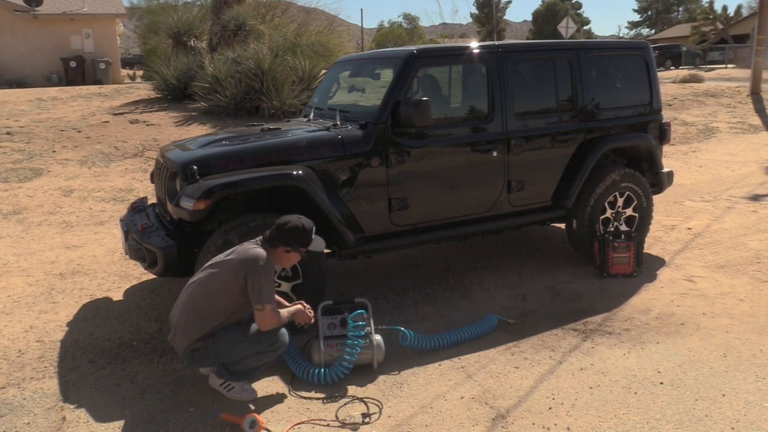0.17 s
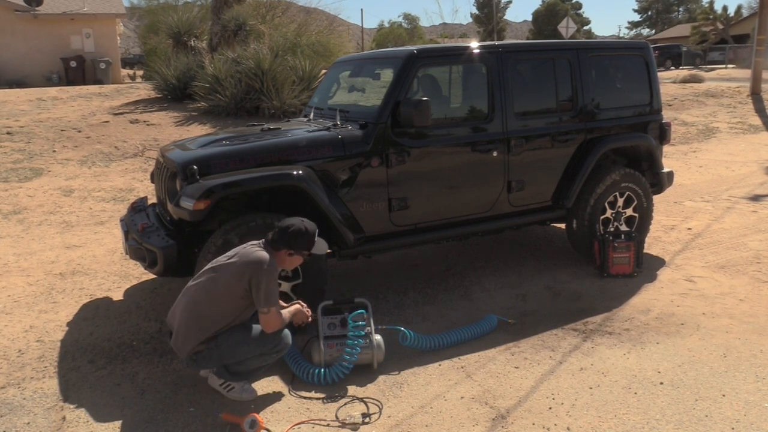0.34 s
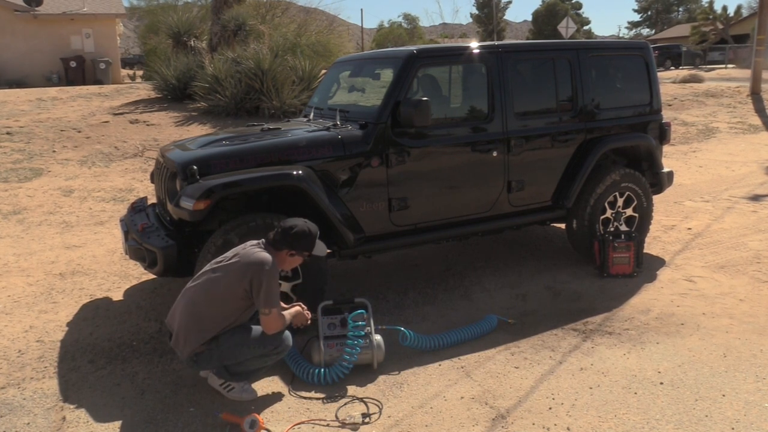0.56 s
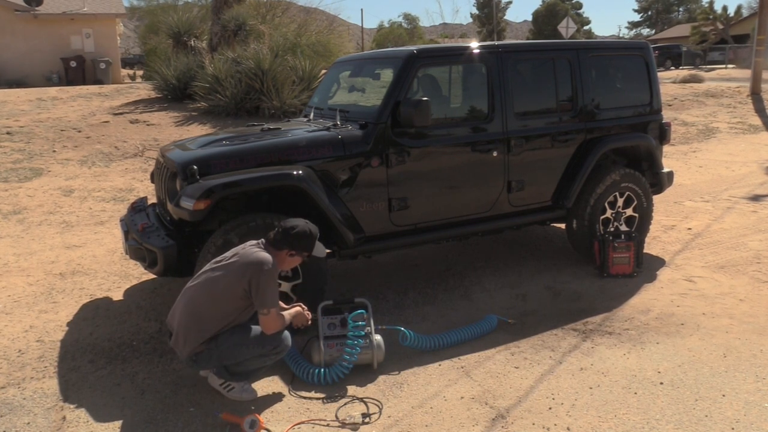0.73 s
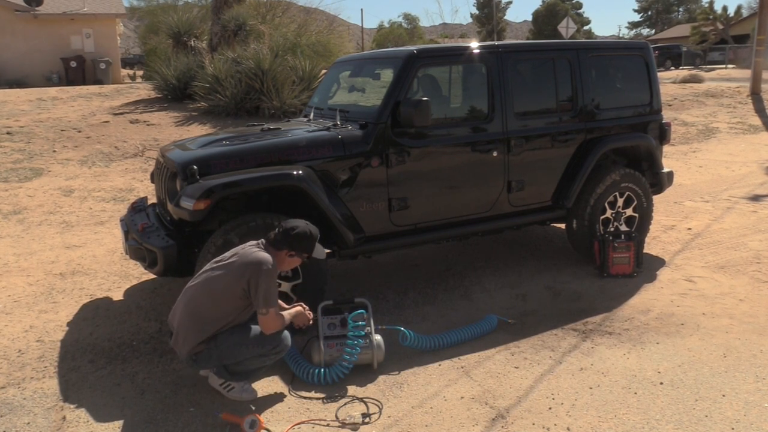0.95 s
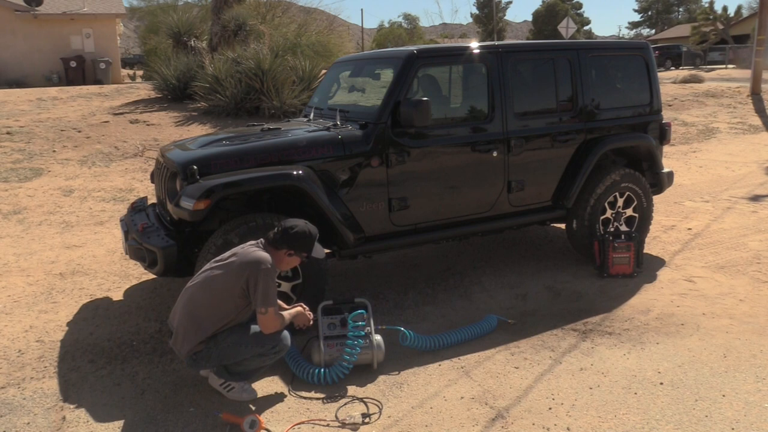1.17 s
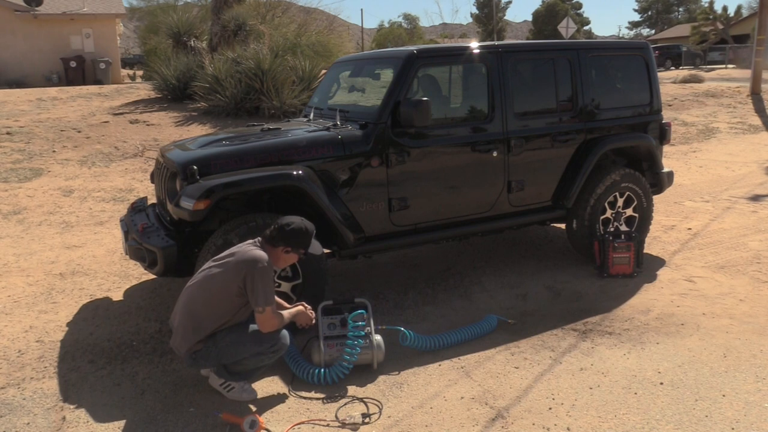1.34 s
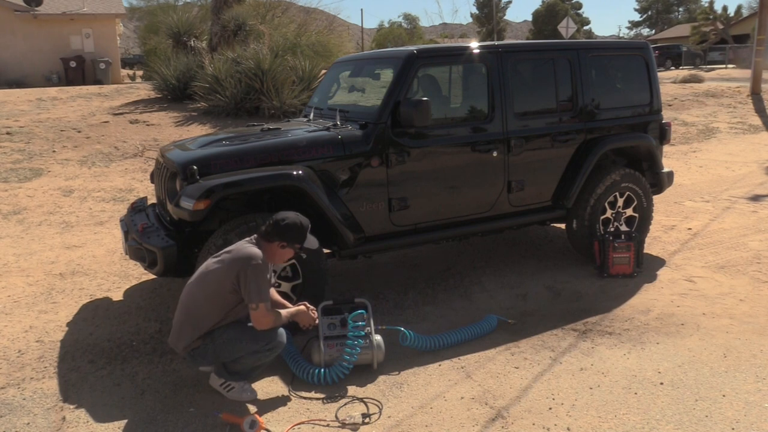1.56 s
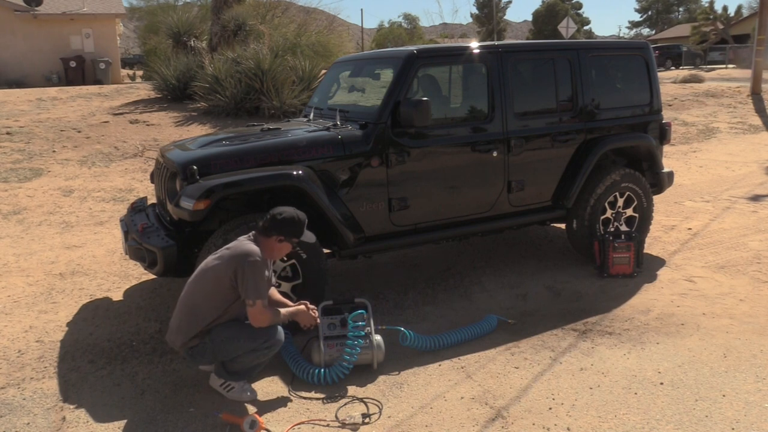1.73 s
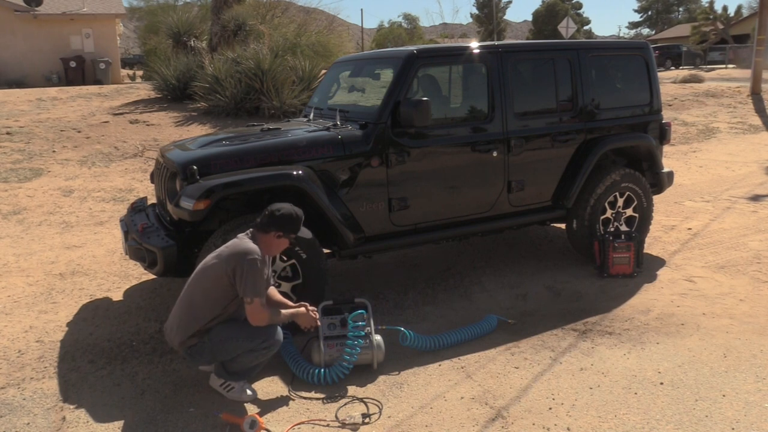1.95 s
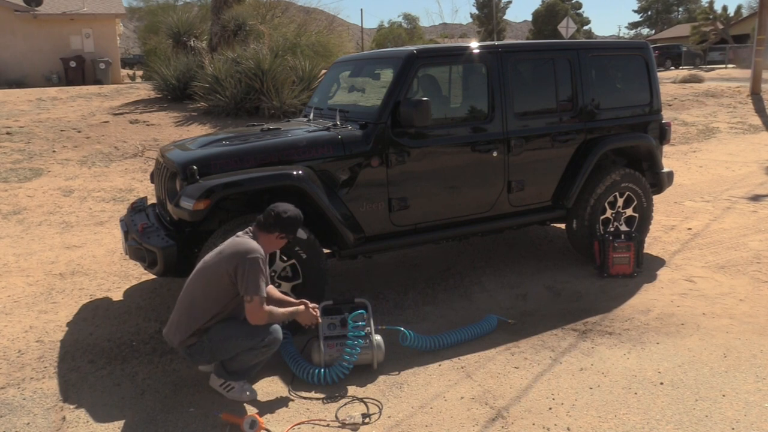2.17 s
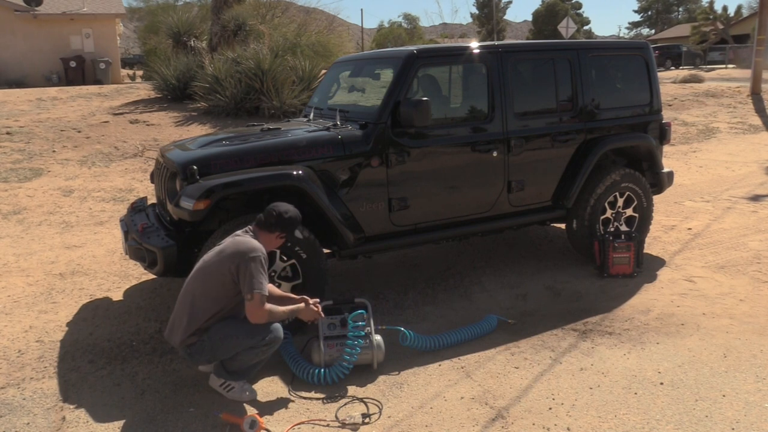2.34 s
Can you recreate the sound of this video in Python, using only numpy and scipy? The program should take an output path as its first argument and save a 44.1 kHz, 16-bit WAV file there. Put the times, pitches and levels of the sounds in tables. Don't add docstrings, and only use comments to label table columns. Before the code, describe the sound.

Steady rapid chugging of a small air compressor, with loud buffeting wind bursts in the first second.

```python
import sys
import numpy as np
from scipy import signal
from scipy.fft import rfft, irfft
from scipy.io import wavfile
from scipy.ndimage import uniform_filter1d, map_coordinates

SR = 44100
rng = np.random.default_rng(int(sys.argv[2]) if len(sys.argv) > 2 else 0)


def unload_audio(sound):
    columns = np.transpose(np.atleast_2d(sound))
    steps = np.round(np.clip(columns, -1, 1) * 32767)
    wavfile.write(sys.argv[1], SR, steps.astype(np.int16))


def makeup_ratio(level_db):
    decades = np.asarray(level_db, float) / 20
    return 10 ** decades


N = 105840

TURN_SAMPLES = 1547
# (time [s], level [dB])
MACHINE_SWELL = [(0, 1.5), (.7, 1), (.85, -1.5), (1.03, -3.5), (1.2, 1.5), (1.62, -1), (1.8, 1), (2.4, 1)]
# (place [turns], length [turns], strength [dB])
CLATTER_BLOWS = [
    (.06, 0.011, 10),
    (.17, 0.036, 5),
    (.35, 0.074, -19),
    (.58, 0.29, 1),
    (0.682, 0.057, 0),
    (.86, 0.12, -7.5),
]
# (frequency [Hz], level [dB per Hz])
CLATTER_TONE = [(71, -36), (130, 0.5), (432, -30), (624, -8), (1070, -11.5), (1410, -6.5), (1910, -5.5),
                (5500, -7.5), (7150, -37), (12100, -120)]
# (frequency [Hz], level [dB per Hz])
HISS_TONE = [(900, -6.5), (1600, -3.5), (2500, -2), (4080, -5), (5660, -8.5), (8000, -13), (10900, -21.5),
             (13500, -22.5), (15700, -38)]
# (frequency [Hz], width [Hz], boost [dB])
CASE_RINGS = [(1170, 160, 3), (1875, 90, 7), (2600, 80, 4), (2810, 70, 2), (3180, 110, 4), (3300, 50, 4),
              (3545, 120, 4), (4380, 110, 8), (6290, 300, 6), (7850, 260, 6.5), (8600, 200, 3),
              (9900, 150, 5), (12250, 220, 7)]
# (frequency [Hz], width [Hz], depth [0-1])
GROUND_DIPS = [(1724, 150, 0.05), (4350, 740, 0.4), (5410, 870, 0.71)]
# (place [turns], length [turns], strength [dB])
STROKE_PUFFS = [
    (0.099, 0.34, -4.5),
    (0.663, 0.17, -1.5),
    (0.32, 0.021, -23.5),
]
# (frequency [Hz], level [dB per Hz])
REED_TONE = [(3000, -60), (4500, -17), (5600, 9), (6300, 3), (7900, -14), (9000, -31), (12200, -19),
             (14000, -28)]
# (place [turns], pitch [Hz], peak [dB], ring [s])
REED_PINGS = [
    (.09, 6300, -46, 0.0027),
    (0.55, 7500, -49, 0.0028),
    (.1, 7900, -51, .003),
    (.62, 6400, -51, .003),
    (0.129, 12250, -57, .004),
    (0.598, 4800, -49.5, 0.0053),
]
# (shaft order [multiple], level [dB])
SHAFT_ORDERS = [(6, -58), (24, -57), (28, -59), (29, -55), (30, -57), (31, -60), (33, -56), (35, -58),
                (36, -63), (37, -54), (38, -58), (39, -57), (40, -62), (41, -53), (43, -57), (44, -60),
                (45, -56), (47, -62), (48, -60), (52, -55), (54, -58), (62, -56), (63, -57), (64, -62),
                (65, -56), (66, -51), (67, -57), (68, -61), (69, -61), (70, -60), (71, -61), (72, -60),
                (73, -61), (75, -58), (80, -62), (81, -62), (82, -59), (83, -60), (86, -62), (87, -61),
                (89, -61), (91, -57), (92, -61), (95, -62), (107, -61), (110, -59), (112, -60), (114, -62),
                (115, -60), (116, -57), (120, -62), (121, -61), (123, -58), (124, -62), (125, -57),
                (126, -59), (127, -62), (134, -62), (154, -57)]
# (frequency [Hz], level [dB])
STEREO_WIDTH = [(300, -21), (1000, -23), (2500, -17), (3600, -15), (4300, -5), (8000, -3), (15000, -2.5)]
# (frequency [Hz], level [dB per Hz])
RUMBLE_TONE = [(30, -9), (80, -2.5), (165, 6), (230, 1.5), (320, -10.5), (500, -10), (1500, -84)]
# (time [s], level [dB])
SWIRL_LEVEL = [
    (0.0, -53),
    (0.21, -38),
    (2.4, -57),
]
# (time [s], level [dB])
GUST_LEVEL = [(0, -39.5), (.2, -32.5), (.27, -29), (.29, -16.5), (.39, -19), (.46, -12.5), (.57, -16.5),
              (.6, -27.5), (.66, -38), (.71, -17), (.91, -21.5), (.99, -31.5), (1.09, -27.5), (1.33, -22.5),
              (1.45, -32), (1.49, -23), (1.57, -22), (1.63, -33.5), (1.66, -26.5), (1.82, -37.5),
              (2.0, -48), (2.18, -74), (2.27, -37)]
# (frequency [Hz], level [dB per Hz])
WIND_TONE = [(18, -74), (30, -43), (95, -19), (194, 1), (406, -3), (563, -14.5), (658, -22.5), (900, -32.5),
             (1170, -51), (1980, -120)]
# (frequency [Hz], level [dB per Hz])
SKIRT_TONE = [(350, -9), (520, 5), (800, 7.5), (1300, -29), (2500, -52), (6000, -90)]
# (time [s], length [s], depth [0-1])
LULLS = [(0.269, 0.013, 1), (0.384, 0.0092, .6), (0.434, 0.0072, 0.8), (0.595, 0.0098, 0.5),
         (0.793, 0.0081, 0.65), (0.854, .012, 0.93), (0.922, 0.0068, 0.65), (.967, 0.0073, 0.7),
         (1.006, 0.0088, 1), (1.46, 0.0095, 0.6), (1.63, 0.0096, 0.64)]
# (time [s], peak [dB], pitch [Hz])
EDDIES = [(0.2455, -15, 467), (0.255, -13, 357), (0.2934, 1.5, 403), (0.3046, -10, 320), (0.317, -3.5, 435),
          (0.3283, -7, 298), (0.3401, -3.5, 368), (0.3483, -10, 447), (0.3558, -5.5, 407), (0.365, -9, 450),
          (0.3717, -13, 430), (0.391, -13, 440), (0.3988, -10, 483), (0.4073, -4, 464), (0.433, -3.5, 365),
          (0.445, -15, 460), (0.4573, 2.5, 437), (0.4707, 4, 253), (0.4807, -7, 480), (0.4896, -7, 320),
          (0.4964, -5, 454), (0.5061, -5, 430), (0.5136, 3.5, 413), (0.5207, 0.5, 370), (0.5328, -14, 390),
          (0.5439, 1.5, 400), (0.5532, -4.5, 482), (0.5616, -0.5, 347), (0.5701, -6, 268),
          (0.6841, -11.5, 234), (0.7074, -10.5, 246), (0.7155, -4.5, 334), (0.7281, -11, 238),
          (0.762, -4, 407), (0.768, -6, 464), (0.7756, -8.5, 485), (0.8038, -7, 352), (0.8124, -6.5, 486),
          (0.837, -10.5, 380), (0.8492, -7.5, 390), (0.872, -7, 360), (0.8791, -10, 490), (0.891, -11, 328),
          (0.9, -7.5, 430), (0.9055, -7, 310), (1.1005, -12, 403), (1.1321, -17, 307), (1.2061, -19, 295),
          (1.269, -19, 360), (1.304, -10, 380), (1.3213, -11, 347), (1.4035, -16, 317), (1.4842, -9.5, 320),
          (1.5202, -22, 223), (1.5385, -9.5, 288), (1.5453, -8, 388), (1.5587, -7.5, 447),
          (1.5648, -6.5, 446), (1.6541, -15.5, 420), (1.6995, -8, 290)]
# (start [s], end [s], level [dB])
TEARS = [
    (0.27, 0.43, -34.5),
    (0.454, 0.473, -28.5),
    (0.485, 0.521, -30),
    (0.522, 0.582, -35),
    (0.702, 0.786, -36),
    (0.788, 0.812, -31.5),
    (1.215, 1.335, -56),
    (1.52, 1.578, -52),
]
# (frequency [Hz], level [dB per Hz])
RASP_TONE = [(450, -26), (600, 5), (1250, 2.5), (2700, -2.5), (4500, -15.5), (7000, -49), (12000, -90)]
# (time [s], peak [dB], pitch [Hz])
GRILLE_TICKS = [
    (0.4063, -20, 3900),
    (0.4595, -14, 4300),
    (0.4598, -23, 5800),
    (.469, -17, 3400),
    (.4691, -23, 5600),
]


def level(x, db):
    return x * makeup_ratio(db) / np.sqrt(np.mean(x ** 2))


def curve(table):
    return np.interp(np.arange(N) / SR, *np.array(table).T[:2])


def colour(x, table, rings=(), dips=()):
    hz = np.maximum(np.arange(N // 2 + 1) * SR / N, 1)
    points_hz, points_db = np.array(table)[:, :2].T
    gain = makeup_ratio(np.interp(np.log(hz), np.log(points_hz), points_db))
    for centre, width, db in rings:
        gain = gain * (1 + (makeup_ratio(db) - 1) / (1 + (2 * (hz - centre) / width) ** 2))
    for centre, width, depth in dips:
        gain = gain * (1 - depth / (1 + (2 * (hz - centre) / width) ** 2))
    return irfft(rfft(x) * gain, N)


def walk(rate):
    hold = int(SR / rate)
    steps = np.repeat(rng.standard_normal(N // hold + 1), hold)
    return 1.14 * uniform_filter1d(uniform_filter1d(steps, hold), hold)[:N]


def add(out, s, shape):
    start = int(s * SR) - len(shape) // 2
    out[..., start:start + len(shape)] += shape


def shaft():
    first_stroke_s, drift = .0005, 0.00034
    steady = np.arange(N) / TURN_SAMPLES - first_stroke_s * SR / TURN_SAMPLES + 1
    return steady + np.cumsum(drift * walk(2.93)) / TURN_SAMPLES


def valves(turn, rest_db, table):
    gate = makeup_ratio(rest_db)
    for place, length, db in table:
        u = ((turn - place + 0.13) % 1 - .1) / length
        gate = gate + makeup_ratio(db) * np.exp(-np.where(u < 0, 6 * u ** 2, u))
    return gate


def turning_rattle(place):
    repeat = 0.65
    fresh = rng.standard_normal((N // TURN_SAMPLES + 40, TURN_SAMPLES))
    kept = signal.lfilter([1], [1, -repeat], fresh, axis=0)[30:].ravel()
    return map_coordinates(kept, [place * TURN_SAMPLES], order=3)


def clatter(place, rattle):
    struck = rattle * valves(place, 0, CLATTER_BLOWS)
    return level(colour(struck, CLATTER_TONE, CASE_RINGS, GROUND_DIPS), -43.5)


def stroke_air(place):
    stroke = makeup_ratio(.4 * rng.standard_normal(300))[(2 * place + .1).astype(int)]
    return valves(place, -8, STROKE_PUFFS) * uniform_filter1d(stroke, size=80)


def valve_hiss(puff):
    flicker_db, flicker_rate = 1.5, 45
    jet = colour(rng.standard_normal(N) * puff, HISS_TONE, CASE_RINGS, GROUND_DIPS)
    hz, spectrum = np.arange(N // 2 + 1) * SR / N, rfft(jet)
    edges_hz = [0, 3000, 5500, 9200, SR]
    hiss = np.zeros(N)
    for low, high in zip(edges_hz, edges_hz[1:]):
        band = irfft(spectrum * ((hz >= low) & (hz < high)), N)
        hiss += band * makeup_ratio(flicker_db * walk(flicker_rate))
    return level(hiss, -41)


def pings(place):
    out = np.zeros(N)
    for at, hz, db, ring in REED_PINGS:
        turn, chance = np.floor(place - at).astype(int), rng.standard_normal((100, 3))
        s = ((place - at) % 1) * TURN_SAMPLES / SR
        shape = np.minimum(s / 0.00086, 1) * np.exp(-s / ring)
        pitch = hz * (1 + .01 * chance[turn, 1])
        tone = np.sin(2 * np.pi * (pitch * s + chance[turn, 2]))
        out += makeup_ratio(db + 2 * chance[turn, 0]) * shape * tone
    return out


def whine(place):
    knock_turns, knock_spread, knock_top = .03, .65, 55
    out = np.zeros(N)
    for order, db in SHAFT_ORDERS:
        strength = makeup_ratio(db - 1.43 + .5 * walk(4.1))
        spread = knock_spread if order < knock_top else 1
        phase = (rng.random() - .5) * spread
        out += strength * np.cos(2 * np.pi * (order * (place - knock_turns) + phase))
    return out


def compressor():
    place = shaft()
    rattle = turning_rattle(place)
    knocks = clatter(place, rattle)
    puff = stroke_air(place)
    reeds = level(colour(rattle * puff ** 2, REED_TONE, CASE_RINGS), -59.5)
    hiss, side_hiss = valve_hiss(puff), valve_hiss(puff)
    mid = knocks + hiss + reeds + pings(place) + np.sqrt(2) * whine(place)
    spread = colour(side_hiss + np.roll(mid, 400), STEREO_WIDTH) * 0.49
    side = spread - colour(mid, STEREO_WIDTH) * (makeup_ratio(2) - 1)
    swell = makeup_ratio(curve(MACHINE_SWELL) + 0.17 * walk(3.1))
    return swell * np.array([mid + side, mid - side])


def far_rumble():
    rumble = level(colour(rng.standard_normal(N) * makeup_ratio(2 * walk(7.72)), RUMBLE_TONE), -37)
    return rumble * makeup_ratio(curve(SWIRL_LEVEL) + 47)


def gusts():
    grain_db, grain_rate, flutter_db = 2, 1000, 1
    gust = curve(GUST_LEVEL)
    size = makeup_ratio(grain_db * np.minimum(rng.exponential(size=N), 3)) * np.sign(rng.random(N) - .35)
    grains = (rng.random(N) < grain_rate / SR) * size * makeup_ratio(flutter_db * walk(40.3))
    grains = grains - uniform_filter1d(grains, size=2000)
    body = level(colour(grains, WIND_TONE), -3) * makeup_ratio(1.255 * (gust + 25) - 25.5)
    skirt = level(colour(grains, SKIRT_TONE), -31) * makeup_ratio(1.4 * (gust + 12))
    return body, skirt


def lull_gate():
    t, calm = np.arange(N) / SR, np.ones(N)
    for s, length, depth in LULLS:
        calm *= 1 - min(depth, .95) * np.exp(-((t - s) / length) ** 2)
    return calm


def eddy_thumps():
    cycles = 0.7
    u, thumps = np.arange(-400, 400) / SR, np.zeros(N)
    for s, db, hz in EDDIES:
        wave = np.exp(-(u * hz / cycles) ** 2) * np.cos(2 * np.pi * hz * u + 0.16)
        sharp = np.exp(-(2 * u * hz / cycles) ** 2) * np.cos(5 * np.pi * hz * u)
        add(thumps, s, makeup_ratio(db - 5.5) * wave)
        add(thumps, s, makeup_ratio(db - 20) * sharp)
    return thumps


def tearing(big):
    t, edge_s = np.arange(N) / SR, .01
    tear = np.zeros(N)
    for start, end, db in TEARS:
        tear += makeup_ratio(db) * np.clip(np.minimum(t - start, end - t) / edge_s + .5, 0, 1)
    tear = tear * (1 + 3 * big) * makeup_ratio(2 * walk(59.1))
    rasps = []
    for _ in range(2):
        grain = rng.standard_normal(N) * makeup_ratio(2 * walk(200))
        rasps.append(level(colour(grain, RASP_TONE), 0) * tear)
    mid, side = rasps
    return mid, side * makeup_ratio(-9) + 0.078 * mid


def wind():
    body, skirt = gusts()
    thumps = eddy_thumps()
    big = uniform_filter1d(np.abs(thumps), size=200)
    mid, side = tearing(big)
    side = side + makeup_ratio(-49.5) * np.roll(body + thumps, 90)
    ducked = (body + skirt) * lull_gate() / (1 + 7.1 * big)
    blow = ducked + colour(thumps, [(40, -19), (150, -1.0)]) + far_rumble()
    return blow + np.array([mid + side, mid - side])


def ticks():
    out, u = np.zeros(N), np.arange(-300, 300) / SR
    cracks = rng.standard_normal((len(GRILLE_TICKS), 600))
    for (s, db, hz), crack in zip(GRILLE_TICKS, cracks):
        ring = np.sin(2 * np.pi * hz * u)
        add(out, s, makeup_ratio(db) * np.exp(-np.abs(u) / .0005) * (ring + .5 * crack))
    out = signal.sosfilt(signal.butter(4, [1800, 6800], "band", fs=SR, output="sos"), out)
    return out * makeup_ratio(np.array([[-8], [0]]))


def scene():
    return compressor() + wind() + ticks()


def roll_off(x):
    return signal.sosfilt(signal.butter(12, 15730, fs=SR, output="sos"), x)


def record(dry):
    driven = np.tanh(.5 * dry) / .5
    mix = signal.sosfilt(signal.butter(2, 124.4, "high", fs=SR, output="sos"), driven)
    mix = signal.sosfilt(signal.butter(8, 15500, fs=SR, output="sos"), mix)
    return roll_off(mix)


dry = scene()
out = record(dry)
unload_audio(out)
```